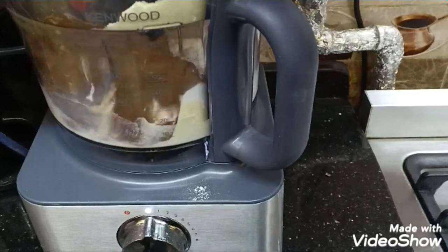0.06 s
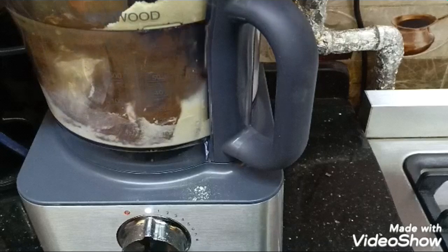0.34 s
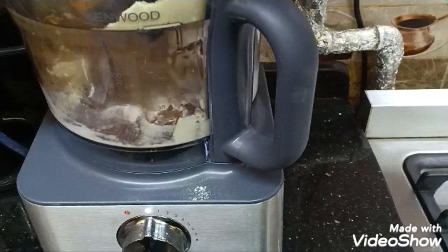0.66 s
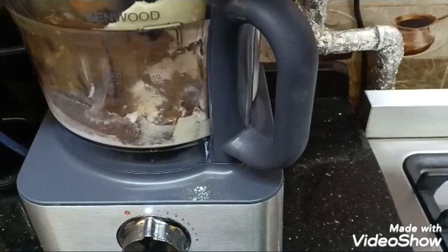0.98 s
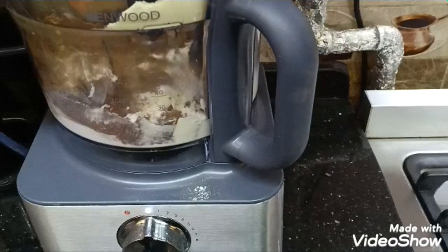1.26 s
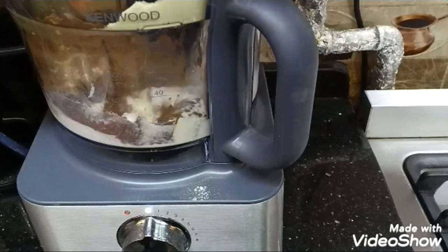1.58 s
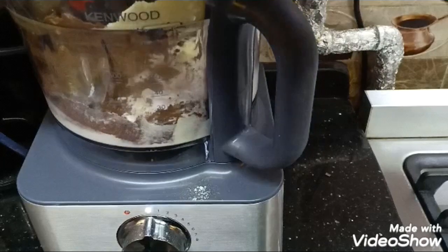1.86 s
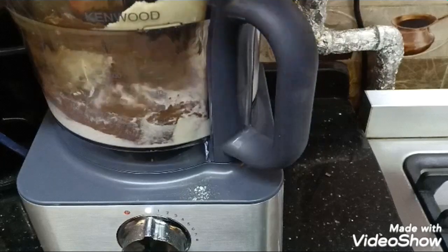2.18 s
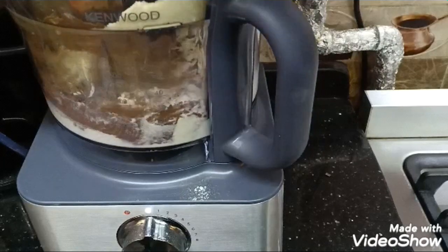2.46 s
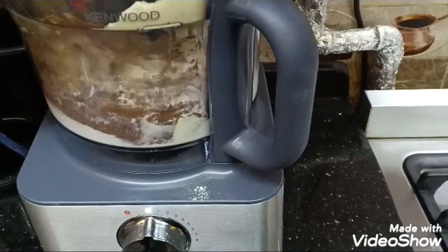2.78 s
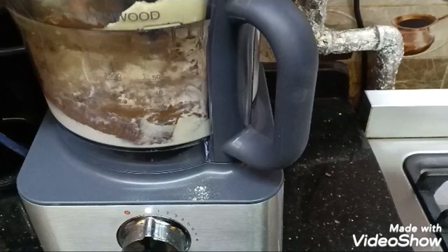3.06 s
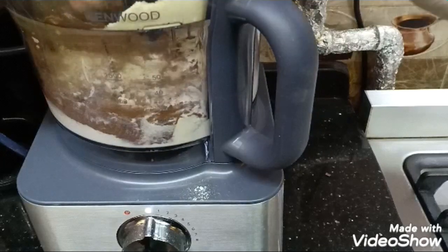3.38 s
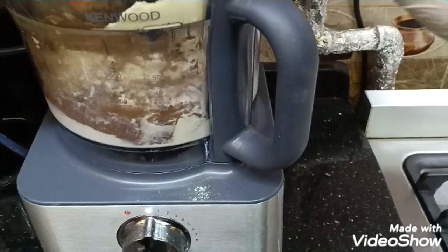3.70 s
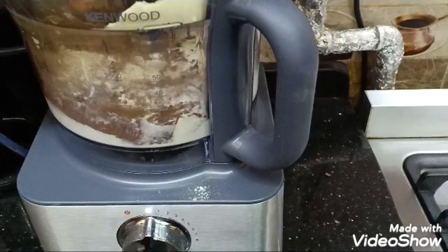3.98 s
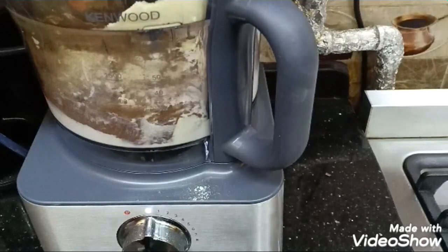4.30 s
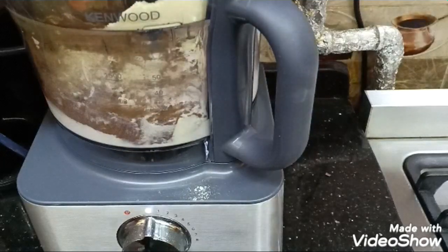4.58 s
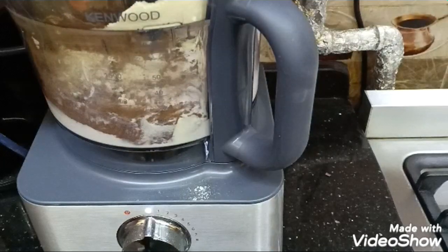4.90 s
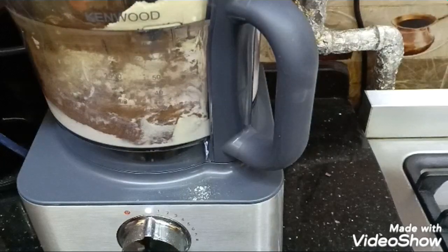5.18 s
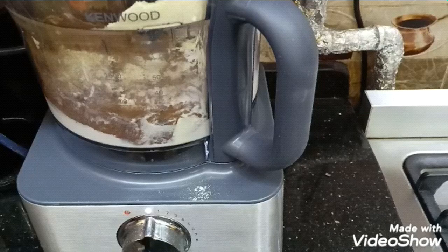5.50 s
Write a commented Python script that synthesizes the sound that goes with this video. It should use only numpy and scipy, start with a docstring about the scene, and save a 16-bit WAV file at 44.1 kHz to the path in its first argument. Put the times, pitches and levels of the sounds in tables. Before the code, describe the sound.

A quiet, steady electrical hum and room noise fill a slightly echoing kitchen. For the first two and a half seconds, hands softly rub the plastic bowl of a food processor, with dull bumps near 0.8, 1.3 and 1.9 seconds. At about 1.3 seconds the lid gives a short, sharp, jerky creak, slightly to the right. A distant bird chirps faintly at 1.6 seconds. From 2.9 to 3.8 seconds the lid clicks round in about seven notches, the last two weaker, while a very faint low rumble swells and fades by 4.5 seconds. Between 4.1 and 5.4 seconds the bird gives four thin rising chirps and a longer whistle, among three light plastic ticks. Near 5.5 seconds comes the loudest sound: the catch snaps shut, leaving a brief ring from the housing and its steel spring.

```python
"""A food processor is handled in a tiled, reverberant kitchen, over mains hum and room noise.
First hands rub and bump the bowl, and the plastic lid knocks once, then creaks by stick-slip friction.
A far bird calls. From about 3 s the lid clicks round notch by notch, each impact exciting its modes,
and a faint rumble swells and fades. The bird whistles again among light plastic ticks. Last, near
5.5 s, the catch snaps shut and sets the housing and its steel spring ringing."""
import sys
import numpy as np
from scipy import signal
from scipy.fft import rfft, irfft, next_fast_len
from scipy.io import wavfile
from scipy.ndimage import map_coordinates

SR = 44100
rng = np.random.default_rng(int(sys.argv[2]) if len(sys.argv) > 2 else 0)


def put_to_file(sound):
    """Save the sound as 16-bit audio at rate SR, in the file named by the first command-line argument."""
    columns = np.atleast_2d(sound).T  # one column per channel
    safe = np.clip(columns, -1, 1)
    whole_steps = np.round(safe * 32767)
    wavfile.write(sys.argv[1], SR, whole_steps.astype(np.int16))


N = 248724

# left-right correlation of the diffuse field: frequency_hz, correlation
COHERENCE = [(100, 0.85), (290, 0.96), (640, 0.4), (1400, -0.22), (3000, 0.15), (15000, -0.21)]


def catch():
    """Impact excitation: the catch hits twice, and the second hit rings the housing and steel spring."""
    # the two hits: start_s, level_db, tilt_db_per_octave
    hits = [(5.4515, -4.5, 2), (5.4555, -8.5, 0.5)]
    # contact spectrum: frequency_hz, level_db
    spectrum = [(120, -24), (300, -17.5), (480, -2), (720, -4), (1150, -1.5), (1900, -3), (2900, 0),
                (4100, -18), (5200, -11), (6400, -16.5), (7500, -32.5), (15000, -27)]
    # modes of housing and spring: frequency_hz, level_db, t60_s
    modes = [(456, -9, .26), (703, -5, .22), (771, -4, .23), (970, -11, .25), (1110, -10, .21),
             (1361, -2, .17), (1647, -9, .22), (1932, 0, .15), (1982, -2, .15), (2078, -5, .12),
             (2407, -4, .14), (2603, -2, .17), (2859, -4, .16), (2923, -3, .17), (3149, -11, .18),
             (3725, -12, .17), (4823, -6, .18), (4965, -6, .19), (5021, -1, .2), (6223, -17, .17),
             (6470, -15, .17)]
    crack = kitchen(amp(-3) * cracks(hits, spectrum, t60_s=0.039), wet_db=-4.5, onset_s=0.005)
    return crack + kitchen(amp(-4.5) * rings(hits[-1:], modes), wet_db=-36)


def lid():
    """Modal vibration: the lid rings from one early knock, then from its notches clicking round."""
    # lid clicks, the knock first and then the notches: start_s, level_db, tilt_db_per_octave
    clicks = [(.794, -38.5, -4.5), (2.914, -22, 1), (3.0595, -19, 2), (3.1995, -22.5, 0.5), (3.336, -21, 0),
              (3.498, -17, 1), (3.619, -28.5, -0.5), (3.766, -34, 1.5)]
    # contact spectrum: frequency_hz, level_db
    spectrum = [(120, -20), (260, 2.5), (560, -2), (880, -3.5), (1200, -3), (1900, 0.5), (3100, 0),
                (4100, -13.5), (5800, -12), (7000, -23), (15000, -14)]
    # lid modes: frequency_hz, level_db, t60_s
    modes = [(313, -3.5, 0.16), (494, -10, 0.053), (858, 2, 0.073), (974, -1.5, 0.071), (1630, -0.5, 0.079),
             (1870, 7, 0.035), (2200, -19, .05), (2457, 0.5, 0.038), (2895, 6.5, 0.027), (3055, -3, 0.04),
             (3720, -13, 0.073), (4890, -18, 0.036), (5480, -11.5, 0.046), (5780, -19, 0.072)]
    crack = kitchen(amp(-2.5) * cracks(clicks, spectrum, t60_s=0.032), wet_db=0.5, onset_s=0.0037)
    return crack + kitchen(rings(clicks, modes), wet_db=-9.5)  # the ring is mostly direct sound


def creak():
    """Stick-slip friction: the rim releases in a fast train of small slips between a few hard jerks."""
    # hard jerks: start_s, level_db, tilt_db_per_octave
    jerks = [(1.326, -13, 4.5), (1.34, -17, 4.5), (1.347, -23, 2.5), (1.4245, -26, 0), (1.4355, -20, 1.5),
             (1.456, -35, -7)]
    # course of the slipping: time_s, slips_per_s, level_db
    course = [(1.333, 190, -21), (1.355, 173, -21.5), (1.39, 178, -23.5), (1.419, 160, -26)]
    # contact spectrum: frequency_hz, level_db
    spectrum = [(150, -34), (500, 0.5), (1000, -6), (1650, 5), (2200, -8), (2750, 1), (3400, -15.5),
                (4500, -3.5), (5400, 2.5), (6600, -14), (9000, -18.5), (15000, -20)]
    # rim modes: frequency_hz, level_db, t60_s
    modes = [(1550, -7, 0.031), (1773, -3.5, 0.025), (2760, -3, 0.015), (4007, -6.5, 0.024),
             (4900, -7, 0.0077), (5320, -11, 0.041)]
    rate, db = curves(course)
    start, end = round(course[0][0] * SR), round(course[-1][0] * SR)
    slip_count = np.floor(np.cumsum(rate[start:end]) / SR)
    onsets = start + np.flatnonzero(np.diff(slip_count))
    scatter = rng.standard_normal((len(onsets), 2)) * [0.0001, 0.5]
    slips = [(i / SR + late_s, db[i] + extra_db, 0) for i, (late_s, extra_db) in zip(onsets, scatter)]
    hits = jerks + slips
    return kitchen(cracks(hits, spectrum, t60_s=0.016) + amp(-7) * rings(hits, modes), wet_db=-8.5)


def bumps():
    """Damped resonance: soft knocks on the full bowl excite its modes with little treble."""
    # knocks: start_s, level_db, tilt_db_per_octave
    knocks = [(.096, -35.5, -6.5), (.795, -28, 1.5), (1.181, -34.5, -2), (1.2785, -31, -3.5),
              (1.501, -36.5, -11), (1.868, -30, -3), (1.902, -40, -10)]
    # contact spectrum: frequency_hz, level_db
    spectrum = [(120, -28), (330, 8.5), (1000, 8), (1700, -3.5), (2800, -17), (4000, -35.5), (6000, -29),
                (15000, -92)]
    # bowl modes: frequency_hz, level_db, t60_s
    modes = [(337, -7.5, 0.36), (407, -20, 0.23), (550, -8.5, 0.097), (700, 15, 0.02), (1014, -5, 0.096),
             (1150, 8, 0.029), (2590, 17.5, 0.017)]
    thud = amp(-3) * cracks(knocks, spectrum, t60_s=0.07)
    return kitchen(thud + amp(-1) * rings(knocks, modes), wet_db=-9.5)


def ticks():
    """Contact transients: small plastic parts touch without ringing."""
    # light touches: start_s, level_db, tilt_db_per_octave
    touches = [(.97, -37.5, -6.5), (1.252, -39, -7), (1.7245, -40, -4), (1.8425, -34.5, -6), (3.33, -36, 3),
               (4.222, -34.5, 3.5), (4.518, -28, 11.5), (4.778, -33, 9)]
    # contact spectrum: frequency_hz, level_db
    spectrum = [(150, -17.5), (500, -1), (1500, 8.5), (2800, 7), (3800, -0.5), (5200, 6.5), (7000, -11),
                (10000, -5.5), (15000, -5)]
    return kitchen(amp(-0.5) * cracks(touches, spectrum, t60_s=0.045), wet_db=-3.5)


def rubbing():
    """Sliding friction: skin drags on plastic in uneven grips, pressing in quickly and easing off."""
    # hand strokes: firmest_s, length_s, body_db, hiss_db
    strokes = [(.01, 0.15, -49.5, -54), (0.398, 0.18, -52, -57.5), (1, 0.18, -46.5, -53.5),
               (1.177, 0.19, -40.5, -49.5), (1.234, .1, -41, -48.5), (1.433, 0.14, -42.5, -63),
               (1.743, 0.56, -61, -59), (2.067, 0.48, -50, -62), (2.142, 0.22, -51.5, -53),
               (2.502, 0.25, -51, -57.5)]
    # low band of the friction noise: frequency_hz, level_db
    body_spectrum = [(120, -45), (300, 5.5), (550, 6.5), (900, -5), (1500, -3), (2700, -4), (4000, -48.5),
                     (8000, -60)]
    # high band of the friction noise: frequency_hz, level_db
    hiss_spectrum = [(1000, -24), (2800, 3), (3800, -3.5), (5300, 2.5), (6800, -8), (9000, -41),
                     (15000, -12.5)]
    press_share, edge_drop_db = 0.4, 18.5  # share of a stroke spent pressing in; drop at its ends
    t, body, hiss = np.arange(N) / SR, np.zeros(N), np.zeros(N)
    for firmest_s, length_s, body_db, hiss_db in strokes:
        away = np.maximum((firmest_s - t) / press_share, (t - firmest_s) / (1 - press_share)) / length_s
        pressure = amp(-edge_drop_db * away)
        body = np.hypot(body, amp(body_db) * pressure)  # strokes add in power
        hiss = np.hypot(hiss, amp(hiss_db) * pressure)
    grip = unit(amp(1.6 * wobble(rate_hz=160)))
    return grip * (body * diffuse(N, body_spectrum) + hiss * diffuse(N, hiss_spectrum))


def bird():
    """A distant source: five calls and one long note arrive mostly by reflection."""
    # gliding calls: flick_s, glide_s, pitch_hz, glide_octaves_per_s, flick_octaves, level_db, overtone_db
    chirps = [(1.643, .07, 1175, 0.6, 0.24, -54, -1.5), (4.108, 0.076, 1135, 2, 0.89, -52, -17),
              (4.356, .075, 1432, -3, 0.59, -50, -26), (4.631, .065, 1499, 0.6, .38, -47, -23),
              (5.025, .1, 1323, 2.5, .5, -51, -16)]
    # course of the long note: time_s, pitch_hz, level_db
    long_note = [(5.18, 1785, -55), (5.225, 1836, -51), (5.25, 1861, -42.5), (5.32, 1818, -50),
                 (5.4, 1780, -46), (5.445, 1866, -54)]
    # its overtones: harmonic_number, level_db
    partials = [(2, -24), (3, -19)]
    calls = sum(whistle(chirp(*call), [(2, overtone_db)]) for *call, overtone_db in chirps)
    song = calls + whistle(long_note, partials)
    return amp(-2) * kitchen(np.array([song, song]), wet_db=5.5, decay_stretch=2.07)


def chirp(flick_s, glide_s, hz, octaves_per_s, flick_octaves, db):
    """Frequency sweep: the course of a call that swells along a glide, then flicks upward and fades."""
    swell_db_per_s, flick_length_s, flick_fade_db = 100, 0.048, 5
    return [(flick_s - glide_s, hz * 2 ** (-octaves_per_s * glide_s), db - swell_db_per_s * glide_s),
            (flick_s, hz, db),
            (flick_s + flick_length_s, hz * 2 ** flick_octaves, db - flick_fade_db)]


def whistle(course, partials):
    """Harmonic series: a wavering tone and its overtones follow rows of time_s, pitch_hz, level_db."""
    hz, db = curves(course)
    edge_s = 0.007
    start_s, end_s = course[0][0] - edge_s, course[-1][0] + edge_s
    gate = swell(start_s, end_s - start_s, edge_s)
    on, note = gate > 0, np.zeros(N)
    wavering_hz = hz * (1 + 0.0042 * wobble(rate_hz=42))
    phase = 2 * np.pi * np.cumsum(wavering_hz[on]) / SR
    overtones = sum(amp(level) * np.sin(round(k) * phase) for k, level in partials)
    note[on] = gate[on] * amp(db[on]) * (np.sin(phase) + overtones)
    return note


def rumble():
    """Narrow-band noise: a faint low rumble comes and goes."""
    # rumble spectrum: frequency_hz, level_db
    spectrum = [(20, -29), (42, -27), (58, 16), (75, 0), (110, -21), (300, -60)]
    return amp(-60.5) * swell(start_s=3.27, length_s=1.2, edge_s=0.2) * diffuse(N, spectrum)


def background():
    """Superposition: mains hum and wavering appliance tones add to the broadband noise of the room."""
    # hum tones: pitch_hz, level_db, waver_hz
    tones = [(68.9, -63, 3.7), (100.5, -55.5, 0.77), (175, -64.5, 4.16), (295, -64, 2.95), (2346, -71, 5.8)]
    # room noise spectrum: frequency_hz, level_db
    spectrum = [(21, -52), (35, -26), (50, -14), (92, -5.5), (123, -7.5), (173, -4.5), (248, -13),
                (372, -6.5), (416, -8.5), (1020, -15.5), (1280, -18.5), (2410, -17), (3870, -31),
                (6070, -26.5), (7600, -50), (9880, -97), (16700, -120)]
    hum = np.zeros(N)
    for hz, db, waver_hz in tones:
        phase = 2 * np.pi * np.cumsum(hz + waver_hz * wobble(rate_hz=12)) / SR
        hum += amp(db) * np.sqrt(2) * np.sin(phase)
    hum *= amp(0.89 * wobble(rate_hz=3.8))
    return hum + amp(-50 + 1.2 * wobble(rate_hz=4.87)) * diffuse(N, spectrum)


def kitchen(x, wet_db, onset_s=0.0015, decay_stretch=1):
    """Reverberation: wall reflections build up behind the direct sound and die sooner in the treble."""
    # reverberation time: frequency_hz, t60_s
    decay = [(150, 0.65), (500, 0.23), (2000, 0.2), (5000, 0.22), (8000, 0.18), (14000, 0.096)]
    hz, t, bands = signal.stft(diffuse(size=SR // 2), SR, nperseg=256)
    t60_s = decay_stretch * along(decay, hz)[:, None]
    tail = signal.istft(bands * fade(t, t60_s), SR, nperseg=256)[1]
    tail *= 1 - np.exp(-(np.arange(tail.shape[1]) / SR / onset_s) ** 2)
    return x + amp(wet_db) * signal.fftconvolve(x, tail / np.linalg.norm(tail[0]), axes=1)[:, :N]


def cracks(hits, spectrum, t60_s):
    """Modal overlap: the dense, fast-dying modes of each contact merge into a burst of noise."""
    out, t = np.zeros((2, N)), np.arange(SR // 8) / SR
    envelope = fade(t, t60_s) * (1 - np.exp(-t / 0.0012))
    for start_s, db, slope in hits:
        tilted = [(hz, level + tilt(hz, slope)) for hz, level in spectrum]
        add(out, start_s, amp(db) * envelope * diffuse(len(t), tilted))
    return out


def rings(hits, modes):
    """Free vibration: each contact starts the main modes as damped sines of slightly new strengths."""
    out, t = np.zeros((2, N)), np.arange(SR // 4) / SR
    hz, mode_db, t60_s = np.transpose(modes)[:, :, None]
    phase = stereo_angle(hz) * rng.choice([-1, 1], hz.shape)
    waves = np.sin(2 * np.pi * hz * t + np.array([phase, -phase]))
    waves *= fade(t, t60_s) * (1 - np.exp(-t / 0.00088))
    for start_s, db, slope in hits:
        strengths = amp(mode_db + tilt(hz, slope) + rng.standard_normal(hz.shape))
        strengths *= rng.choice([-1, 1], hz.shape)
        add(out, start_s, amp(db) * (waves * strengths).sum(axis=1) / np.linalg.norm(strengths))
    return out


def tilt(hz, db_per_octave):
    """Spectral tilt in dB: harder contacts carry more treble."""
    return db_per_octave * np.log2(hz / 1500)


def diffuse(size, spectrum=((1, 0), (2, 0))):
    """Diffuse field: stereo noise of rms 1, coherent in the bass and nearly unrelated in the treble."""
    def response(hz):
        angle = stereo_angle(hz)
        return amp(along(spectrum, hz)) * [np.cos(angle), np.sin(angle)]
    mid, side = filtered(rng.standard_normal((2, size)), response)
    return unit(np.array([mid + side, mid - side]))


def stereo_angle(hz):
    """Half the left-right phase difference that gives the field's correlation."""
    return np.arccos(np.clip(along(COHERENCE, hz), -1, 1)) / 2


def amp(db):
    """Decibels to gain."""
    return 10 ** (np.asarray(db) / 20)


def unit(x):
    """Normalisation to rms 1."""
    return x / np.sqrt(np.mean(x ** 2) + 1e-20)


def along(points, hz):
    """Interpolation of (frequency_hz, value) points on a log axis."""
    frequencies, values = np.transpose(points)
    return np.interp(np.log(hz + 1), np.log(frequencies + 1), values)


def curves(rows):
    """Linear interpolation: one value per sample for each column after the time."""
    times, *columns = np.transpose(rows)
    return [np.interp(np.arange(N) / SR, times, column) for column in columns]


def wobble(rate_hz):
    """Random modulation: a smooth curve through rate_hz knots a second."""
    knots = rng.standard_normal(int(N * rate_hz / SR) + 4)
    return map_coordinates(knots, [np.arange(N) * rate_hz / SR])


def filtered(x, response):
    """Linear filtering: the spectrum of x times a response of frequency."""
    n = x.shape[-1]
    padded = next_fast_len(n + 8192)
    return irfft(rfft(x, padded) * response(np.fft.rfftfreq(padded, 1 / SR)), padded)[..., :n]


def fade(t, t60_s):
    """Exponential decay of 60 dB in t60_s."""
    return np.exp(-np.log(1000) * t / t60_s)


def swell(start_s, length_s, edge_s):
    """Trapezoidal envelope: the gain rises for edge_s, holds, and falls as fast."""
    t = np.arange(N) / SR - start_s
    return np.clip(np.minimum(t, length_s - t) / edge_s, 0, 1)


def add(out, start_s, sound):
    """Superpose a sound on out from start_s."""
    part = out[:, round(start_s * SR):][:, :sound.shape[-1]]
    part += sound[..., :part.shape[-1]]


def scene():
    """Level differences place the impacts slightly to the left and the creak to the right."""
    impacts = (lid() + catch() + bumps() + ticks()) * amp([[0.7], [-0.7]])
    return impacts + creak() * amp([[-0.5], [0.5]]) + rubbing() + bird() + rumble() + background()


def record(dry):
    """Band limiting: the microphone is dull in the top octave and passes nothing above it."""
    # microphone response: frequency_hz, gain_db
    response = [(20, -10), (45, -1.5), (70, 0), (6300, 0), (7300, -1), (8500, -14.5), (10500, -21.5),
                (13500, -16), (15500, -29)]
    top_hz, edge_hz = 15700, 400
    band = lambda hz: np.clip((top_hz - hz) / edge_hz + 0.5, 0, 1)
    return filtered(dry, lambda hz: amp(along(response, hz)) * band(hz))


dry = scene()
out = record(dry)
put_to_file(out)
```